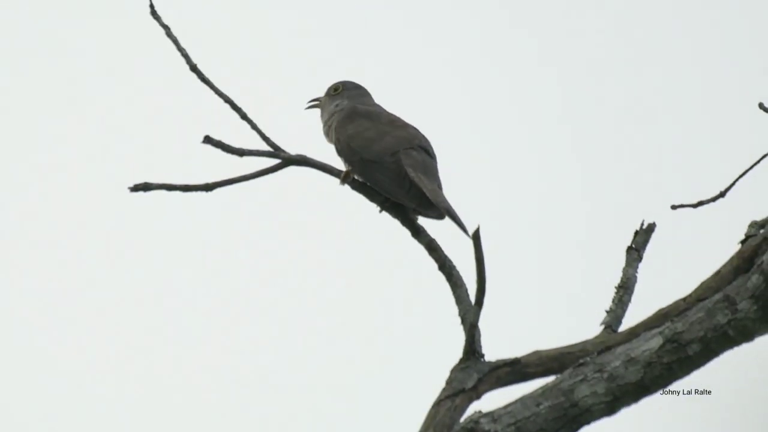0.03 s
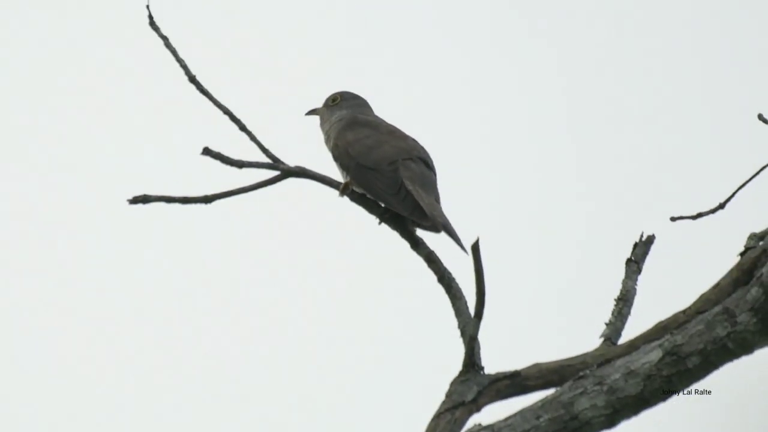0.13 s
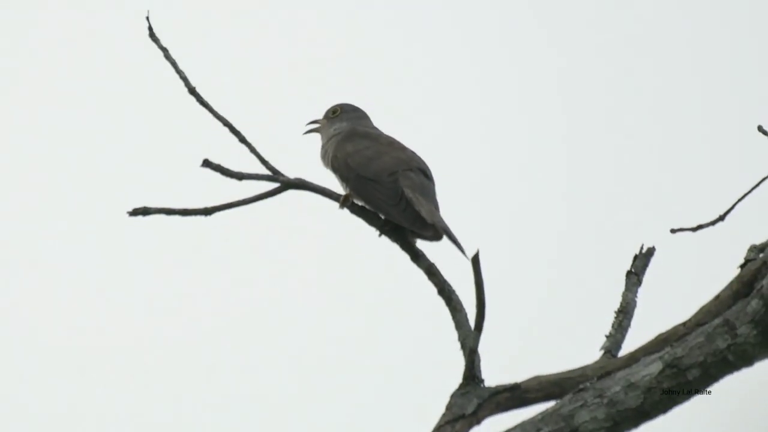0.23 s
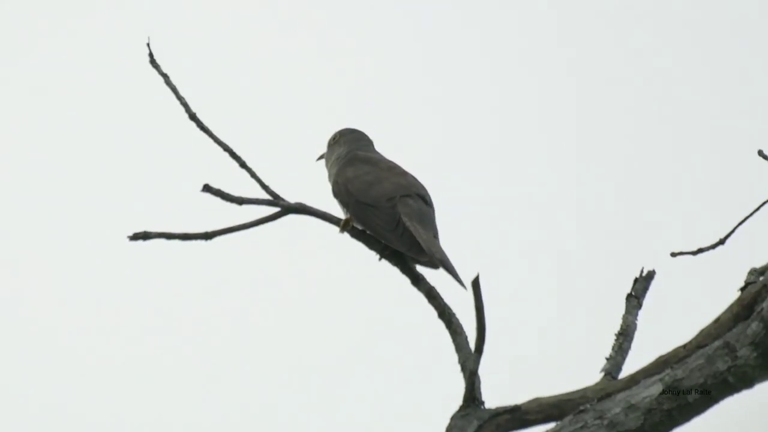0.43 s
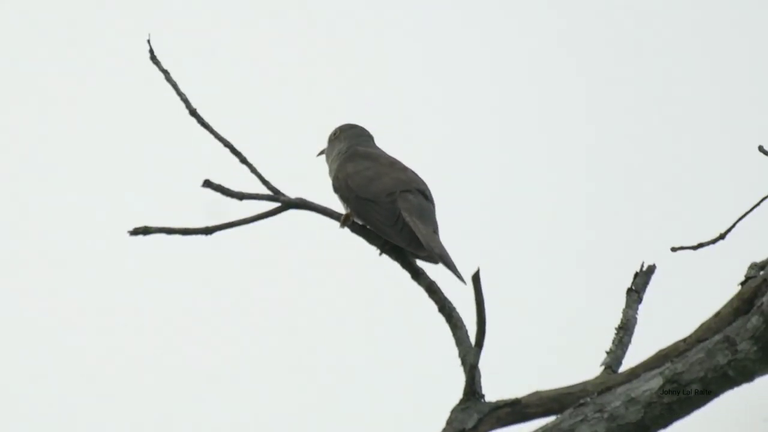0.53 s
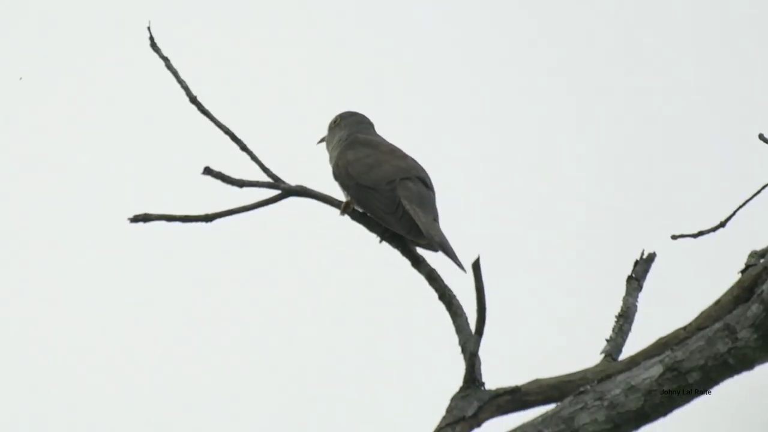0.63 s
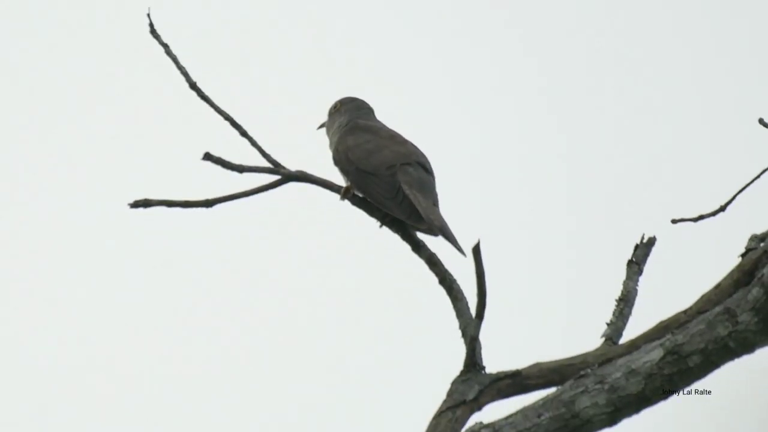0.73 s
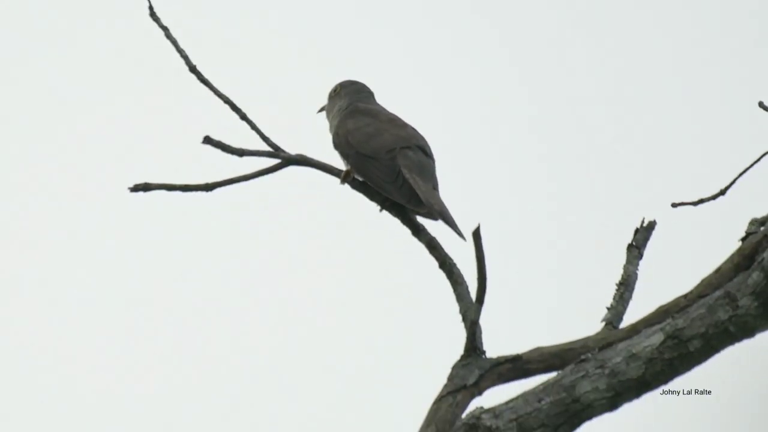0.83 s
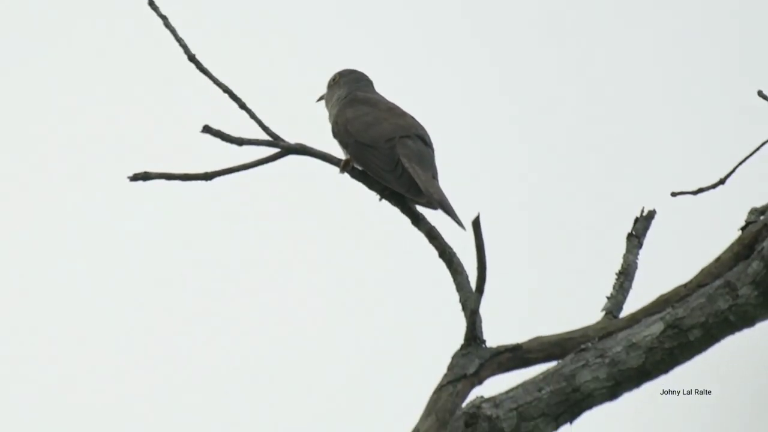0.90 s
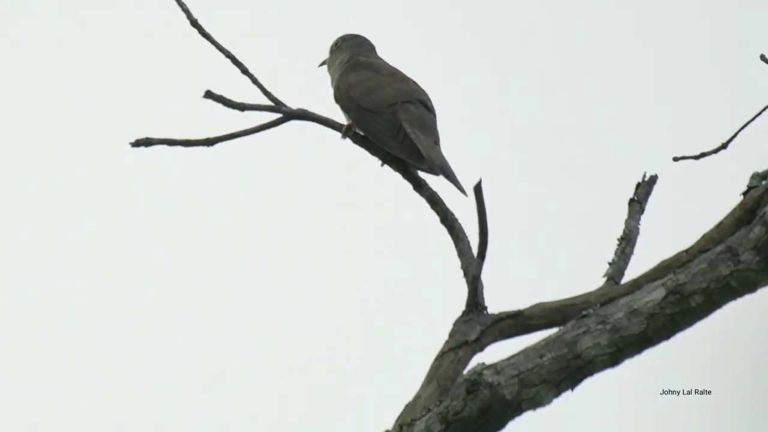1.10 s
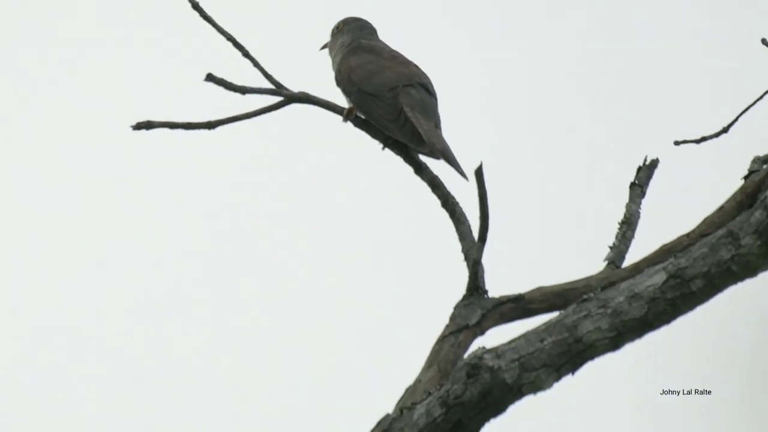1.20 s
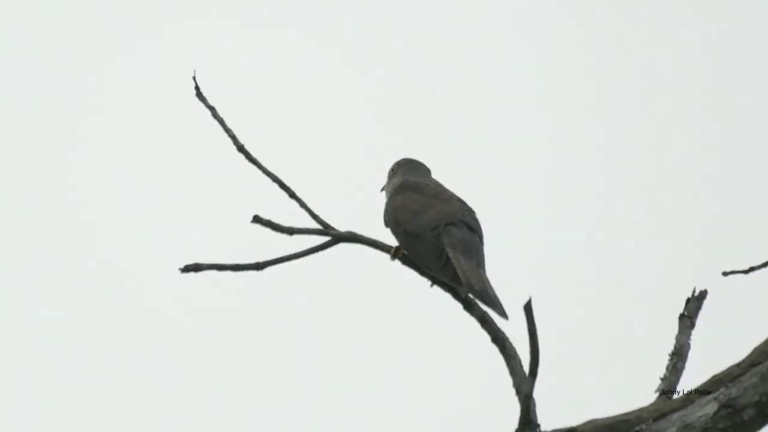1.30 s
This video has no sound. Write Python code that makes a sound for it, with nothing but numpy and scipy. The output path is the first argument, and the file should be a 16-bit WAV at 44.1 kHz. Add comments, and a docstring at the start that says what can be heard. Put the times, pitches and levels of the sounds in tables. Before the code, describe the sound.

A cuckoo whistles two clear notes, the second lower, each ringing briefly among the trees. Behind it, crickets chirp and a high insect chorus trills steadily, with faint distant birds and a soft rumble of air.

```python
"""In a forest, a cuckoo on a bare branch whistles two clear notes, the second lower. Each scoops up
to its pitch and rings on among the trees; the echo of an earlier note is still fading at the start.
Crickets chirp between 4 and 7 kHz with quick strokes of their wings, a chorus of insects trills
steadily near 7.7 kHz, other birds call far off and the air rumbles faintly."""
import sys
import numpy as np
from scipy import signal
from scipy.fft import rfft, irfft, next_fast_len
from scipy.io import wavfile
from scipy.ndimage import uniform_filter1d, map_coordinates

SR = 44100
rng = np.random.default_rng(int(sys.argv[2]) if len(sys.argv) > 2 else 0)


def wav_record(signal):
    """Record a signal, one row per channel, as 16-bit PCM in the file named by sys.argv[1]."""
    frames = np.transpose(np.atleast_2d(signal))
    bounded = np.clip(frames, -1, 1)
    # unit amplitude maps onto the largest positive 16-bit level
    quanta = np.round(bounded * 32767).astype(np.int16)
    wavfile.write(sys.argv[1], SR, quanta)


N = 59535
TIME = np.arange(N) / SR


def amp(db):
    """Turn decibels into a number to multiply by."""
    return 10 ** (np.asarray(db) / 20)


def unit(x):
    """Scale a sound to an average strength (rms) of 1."""
    return x / np.sqrt(np.mean(x ** 2) + 1e-20)


def along(points, hz):
    """Read between (frequency, value) points, with octaves evenly spaced."""
    f, value = np.transpose(points)
    return np.interp(np.log(hz + 1), np.log(f + 1), value)


def pan(db):
    """Gains for the two ears, the left louder by db."""
    return amp(np.array([[db], [-db]]) / 2)


def wobble(rate):
    """A smooth curve through `rate` random values a second."""
    return map_coordinates(rng.standard_normal(int(N * rate / SR) + 4), [TIME * rate])


def filtered(x, response):
    """Multiply each frequency in x by response(frequency)."""
    size = next_fast_len(N + SR // 2)
    return irfft(rfft(x, size) * response(np.fft.rfftfreq(size, 1 / SR)), size)[..., :N]


def arrive(x, delay_s, lead_s):
    """A sound reaches both ears after a delay, the left sooner by lead_s."""
    ear_delays = delay_s + np.array([[-lead_s], [lead_s]]) / 2
    return filtered(x, lambda hz: np.exp(-2j * np.pi * hz * ear_delays))


def rush(spectrum, side_db):
    """Shaped stereo noise; the lower side_db, the more alike the two ears."""
    noise = filtered(rng.standard_normal((2, N)), lambda hz: amp(along(spectrum, hz)))
    mid, side = noise * amp([[0], [side_db]])
    return unit(np.array([mid + side, mid - side]))


def blurred_tone(hz, width_hz):
    """A tone blurred by bouncing around: stereo noise close to one pitch."""
    noise = rng.standard_normal((2, N))
    return unit(filtered(noise, lambda f: np.exp(-((f - hz) / (2 * width_hz)) ** 2)))


# tone colour of the rumble and of the hiss: f/Hz, relative level/dB
RUMBLE_SPECTRUM = [(15, -42), (28, -7), (48, -1.5), (100, -0.5), (160, -3), (320, -3.5), (420, -7),
                   (900, -7.5), (1500, -12), (1900, -5.5), (2500, -8), (3300, -14), (4400, -62),
                   (7500, -87)]
HISS_SPECTRUM = [(2500, -47), (4000, -11.5), (9000, 0), (10500, -3.5), (12000, -10), (15000, -13.5)]

def air():
    """The air rumbles low, under a fine hiss."""
    rumble = amp(-52.5) * pan(0.5) * rush(RUMBLE_SPECTRUM, side_db=-1)
    hiss = amp(-48) * rush(HISS_SPECTRUM, side_db=-0.5)
    return rumble + hiss


# tone colour of the distant crickets: f/Hz, relative level/dB
HAZE_SPECTRUM = [(3300, -27), (3750, -6), (4100, -6), (4400, -9), (4700, -3.5), (5000, 3.5), (5400, -8),
                 (5900, -13), (6300, -15), (6800, -22), (7500, -24.5)]

def cricket_haze():
    """Distant crickets merge into a soft, flickering noise."""
    level_db = -45 + 2 * wobble(14.53) + 1.3 * wobble(110)
    return amp(level_db) * rush(HAZE_SPECTRUM, side_db=-0.5)


# single calls of far crickets and far birds: middle t/s, length/s, f/Hz, level/dB
FAR_CRICKET_CALLS = [(.02, .1, 6120, -49), (.055, 0.037, 5050, -44.5), (.28, 0.033, 5230, -46),
                     (.32, 0.14, 6580, -46), (.41, 0.11, 5960, -45), (.51, 0.054, 5100, -67),
                     (.69, .1, 6690, -47), (.73, .05, 5400, -59), (.94, 0.23, 6000, -51),
                     (1.06, 0.09, 6680, -45), (1.175, 0.052, 5200, -49), (1.33, 0.093, 6050, -52)]
FAR_BIRD_CALLS = [(.49, 0.079, 1880, -53), (.61, 0.11, 2025, -52.5), (1.33, 0.034, 2500, -49)]

def far_callers():
    """Crickets and birds call far off, and the trees smear their sound."""
    out = np.zeros((2, N))
    for calls, width_hz in [(FAR_CRICKET_CALLS, 155), (FAR_BIRD_CALLS, 66)]:
        for middle, length, hz, db in calls:
            fade = np.exp(-np.abs(2 * (TIME - middle) / length) ** 4)
            out += amp(db) * fade * blurred_tone(hz, width_hz)
    return out


def earlier_echo():
    """The forest still rings with the cuckoo's previous note."""
    start_db, fade_db_per_s = -35.5, 44
    return amp(start_db - fade_db_per_s * TIME) * blurred_tone(hz=1247, width_hz=18)


# how long the forest rings: f/Hz, time to fade by 60 dB/s
RING_TIMES = [(500, 0.8), (1250, 0.96), (6000, 0.38), (12000, 0.31)]

def forest_echo(x):
    """Echoes from many trees blend into a tail, made as strong at each ear as x itself."""
    delay_s, build_s = 0.042, 0.035
    hz, t, noise = signal.stft(rng.standard_normal((2, SR)), SR, nperseg=256)
    build = np.clip((t - delay_s) / build_s, 0, 1)
    fade = amp(-60 * t / along(RING_TIMES, hz)[:, None])
    tail = signal.istft(noise * build * fade, SR, nperseg=256)[1]
    ears = signal.fftconvolve(x[None], tail / np.linalg.norm(tail[0]), axes=1)[:, :len(x)]
    return np.array([unit(ear) for ear in ears]) * x.std()


def wing_strokes(rows, length_s, fall_hz_per_s):
    """Short tones that fall as the wing slows; rows hold middle t/s, f/Hz, level/dB."""
    out = np.zeros(N)
    for middle, hz, db in rows:
        first, end = np.searchsorted(TIME, [middle - length_s / 2, middle + length_s / 2])
        t = TIME[first:end] - middle
        turns = hz * t - fall_hz_per_s * t ** 2 / 2 + rng.random()
        fade = np.cos(np.pi * t / length_s) ** 2
        out[first:end] += np.sqrt(2) * amp(db) * fade * np.sin(2 * np.pi * turns)
    return out


# near insects: strokes per second, f/Hz, relative level/dB, left over right/dB
NEAR_TRILLERS = [(54.9, 7430, -3, 13.5), (52.1, 7900, -4, 5.5), (60, 7850, -11, -8)]
# tone colour of the far insects: f/Hz, relative level/dB
CHORUS_SPECTRUM = [(6000, -43.5), (6700, -19), (7050, -7), (7400, -1.5), (7650, -2.5), (7900, 1),
                   (8150, -4), (8400, -12.5), (8700, -21), (9500, -33), (11000, -49)]
# how the whole chorus swells and sinks: t/s, level/dB
CHORUS_SWELL = [(0.0, -43), (0.006, -36.5), (0.09, -39), (0.544, -33.5), (1.064, -39), (1.104, -36.5),
                (1.248, -38), (1.35, -35)]

def insect_chorus():
    """A few near insects trill over the blur of many far ones; all swell together."""
    trills = np.zeros((2, N))
    for rate, hz, db, pan_db in NEAR_TRILLERS:
        chance = rng.standard_normal((100, 3))  # no two strokes are quite alike
        head_start = rng.random()
        rows = [((k - head_start + 0.04 * late) / rate, hz * (1 + 0.0071 * sharp), db + 0.73 * loud)
                for k, (late, sharp, loud) in enumerate(chance)]
        ears = [wing_strokes(rows, length_s=0.0092, fall_hz_per_s=108000) for ear in range(2)]
        trills += pan(pan_db) * np.array(ears)
    blur = amp(0.5) * pan(2.5) * rush(CHORUS_SPECTRUM, side_db=0)
    swell = amp(np.interp(TIME, *np.transpose(CHORUS_SWELL)))
    return swell * (amp(-3) * unit(trills) + blur)


# the low cricket's chirps: first stroke t/s, number of strokes, level/dB
LONG_CHIRPS = [(.140, 7, -44.5), (0.458, 7, -45.5), (0.78, 8, -44), (1.11, 8, -45)]
# the high cricket's chirps: last stroke t/s, number of strokes, last stroke level/dB, f/Hz
SHORT_CHIRPS = [(.066, 2, -43.5, 5020), (.150, 4, -35, 4774), (0.323, 2, -37.5, 4800), (.517, 2, -40, 4690),
                (.630, 3, -36, 4720), (.718, 2, -39.5, 4760), (.731, 2, -41, 5060), (.927, 2, -39, 4760),
                (.961, 2, -41, 4980), (1.006, 2, -36, 4770), (1.136, 2, -38.5, 4700), (1.177, 1, -42, 5050),
                (1.306, 2, -35.5, 4760)]

def crickets():
    """Two kinds of cricket rub their wings: long, even chirps and short, swelling ones."""
    low_hz, low_period_s, accent_db = 4058, 0.0195, 0.5
    low_rows = [(first + k * low_period_s, low_hz, db + accent_db * 0.5 ** k)
                for first, count, db in LONG_CHIRPS for k in range(round(count))]
    low = wing_strokes(low_rows, length_s=0.018, fall_hz_per_s=29400)
    high_period_s, step_db = 0.017, 2
    high_rows = [(last - k * high_period_s, hz, db - step_db * k)
                 for last, count, db, hz in SHORT_CHIRPS for k in range(round(count))]
    high = wing_strokes(high_rows, length_s=0.015, fall_hz_per_s=28000)
    return pan(-8) * low + pan(-0.5) * high + amp(-11.5) * forest_echo(low + high)


# the two notes: start t/s, held f/Hz, slow climb/Hz, length/s
CUCKOO_NOTES = [(.184, 1310, 98.4, 0.14), (.463, 1200, 79.5, 0.132)]
# loudness through each note, one list a note: t/s, level/dB
NOTE_LEVELS = [
    [(.184, -45), (.190, -36), (.199, -30), (.208, -18), (.223, -13.5), (.237, -21.5), (.263, -22),
     (.279, -18), (.288, -41.5), (.296, -23.5), (.305, -27.5), (.314, -56)],
    [(.463, -47), (.472, -35.5), (.484, -27.5), (.502, -22.5), (.514, -26.5), (.529, -22), (.548, -27.5),
     (.567, -41), (.585, -28)],
]
# faint higher tones: multiple of the pitch, first note level/dB, second note level/dB
NOTE_OVERTONES = [(2, -54, -57.5), (5, -46.5, -44), (8, -56, -84)]
# separate echoes off trees: delay/s, relative level/dB, left over right/dB, left ear's lead/s
TREE_ECHOES = [(0.111, -21.5, 2, -.0002), (0.147, -16, 0, .0002), (.295, -29, 10.5, .0001)]

def cuckoo():
    """Nearly pure notes scoop up, then climb slowly to a held pitch; the trees answer."""
    scoop_hz, scoop_s, climb_s = 260, 0.0049, 0.047
    edge_s, swell_s, release_s = 0.0014, 0.054, 0.0086
    out = np.zeros((2, N))
    for i, (start, hz, climb_hz, length) in enumerate(CUCKOO_NOTES):
        age = np.maximum(TIME - start, 0)
        scoop = scoop_hz * np.exp(-age / scoop_s)
        climb = climb_hz * np.maximum(1 - age / climb_s, 0)
        pitch = (hz - scoop - climb) * (1 + 0.0028 * wobble(90.9))  # slightly unsteady
        phase = 2 * np.pi * np.cumsum(pitch) / SR
        when, db = np.transpose(NOTE_LEVELS[i])
        gate = np.clip(np.minimum(TIME - when[0], when[-1] - TIME) / edge_s, 0, 1)
        loudness = uniform_filter1d(gate * amp(np.interp(TIME, when, db)), size=180)
        note = np.sqrt(2) * loudness * np.sin(phase)
        swell = np.clip(np.minimum(age / swell_s, (start + length - TIME) / release_s), 0, 1)
        upper = sum(amp(levels[i]) * np.sin(round(k) * phase) for k, *levels in NOTE_OVERTONES)
        overtones = np.sqrt(2) * swell * upper
        held = swell * note  # the held part of the note is what rings on
        out += pan(-1) * arrive(note + overtones, delay_s=0, lead_s=0.00011)
        out += amp(-12) * forest_echo(held) + amp(-13.5) * forest_echo(overtones)
        for delay_s, echo_db, pan_db, lead_s in TREE_ECHOES:
            out += amp(echo_db) * pan(pan_db) * arrive(held, delay_s, lead_s)
    return out


def scene():
    """The cuckoo, with insects, far callers and air around it."""
    return (cuckoo() + earlier_echo() + crickets() + insect_chorus()
            + far_callers() + cricket_haze() + air())


def record(dry):
    """Cut away the very highest treble."""
    return filtered(dry, lambda hz: hz < 15450)


dry = scene()
out = record(dry)
wav_record(out)
```